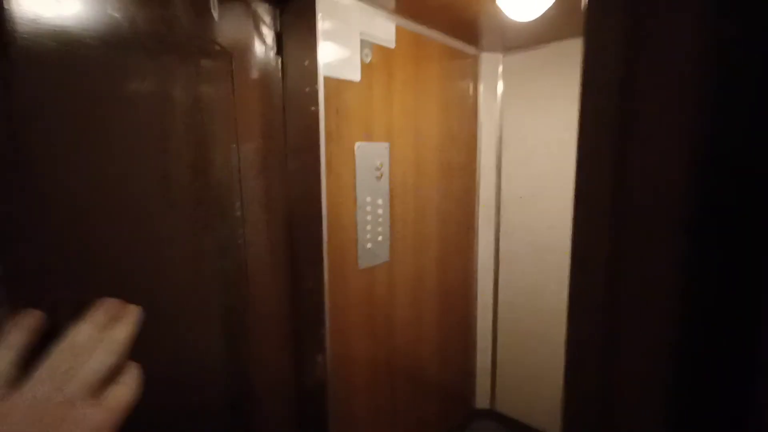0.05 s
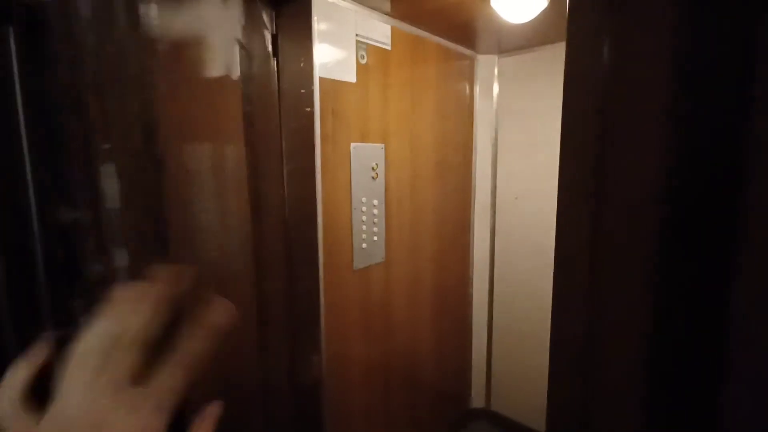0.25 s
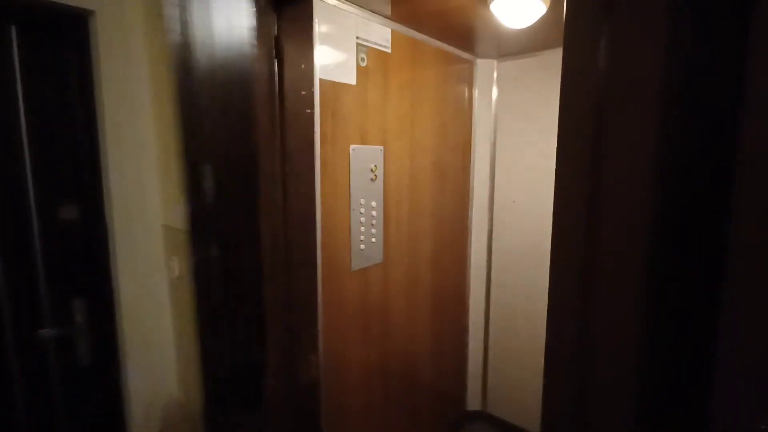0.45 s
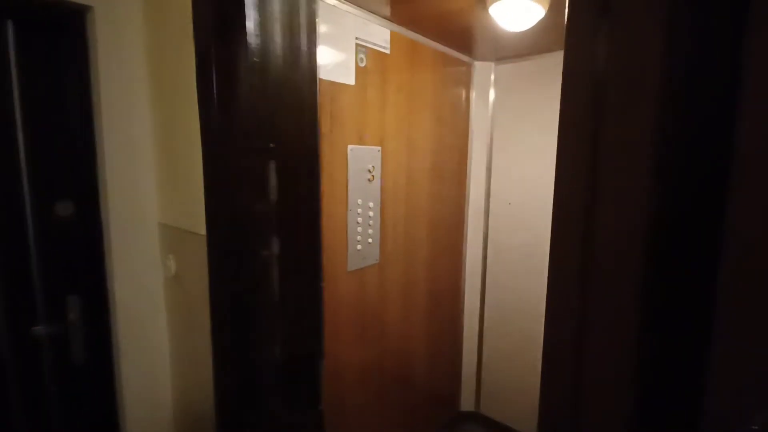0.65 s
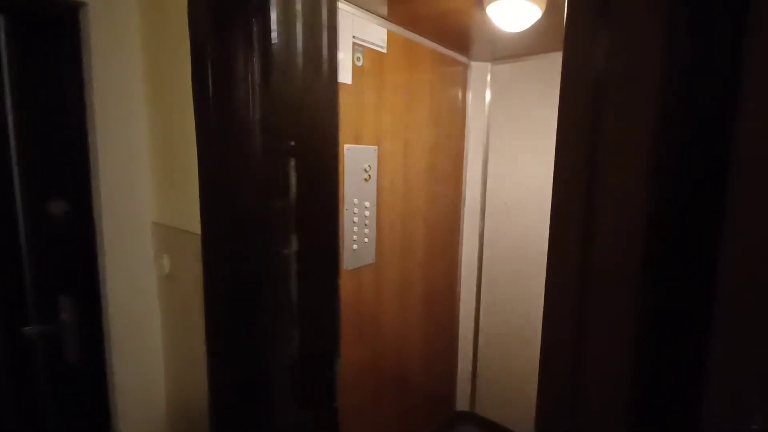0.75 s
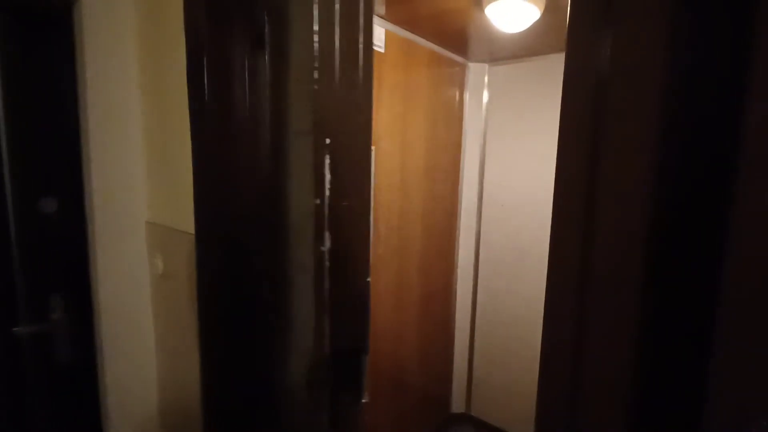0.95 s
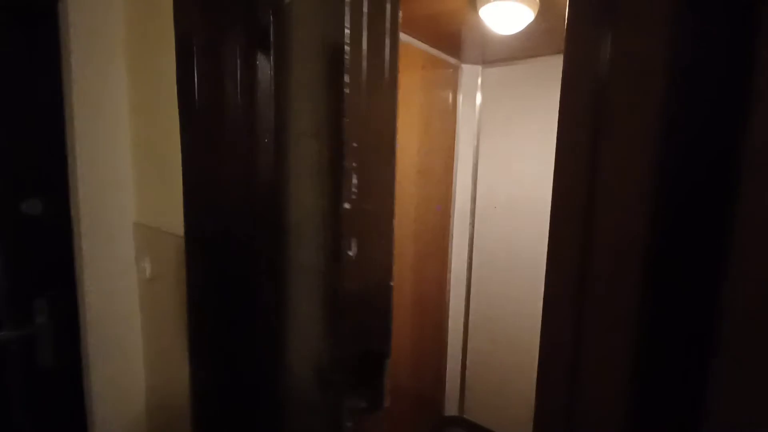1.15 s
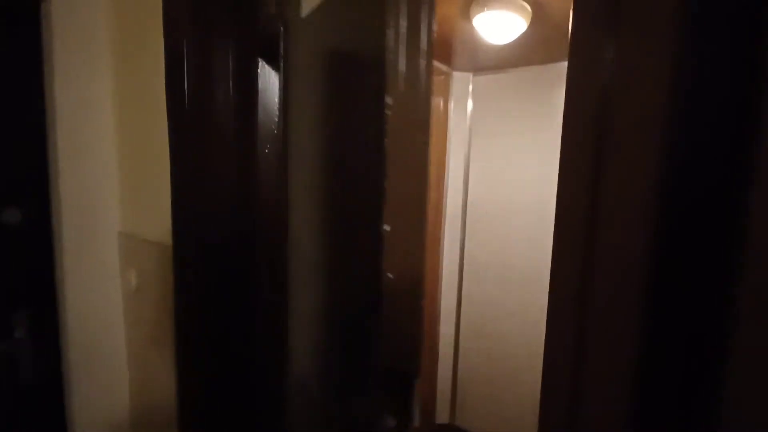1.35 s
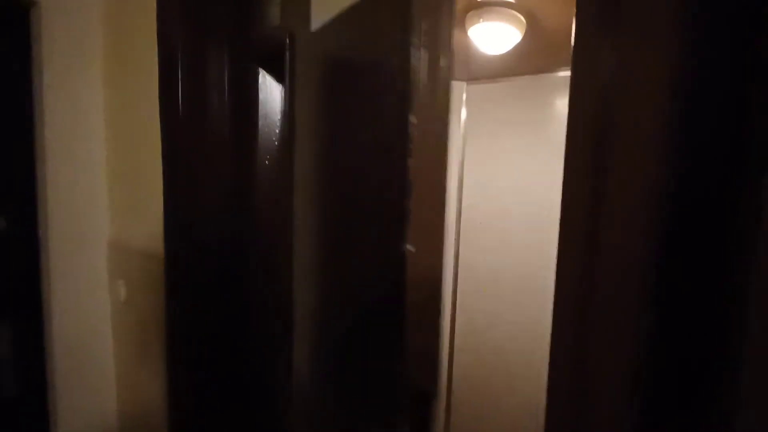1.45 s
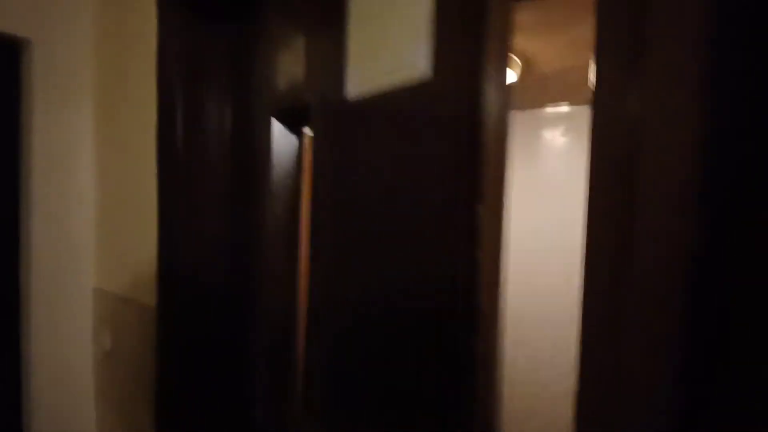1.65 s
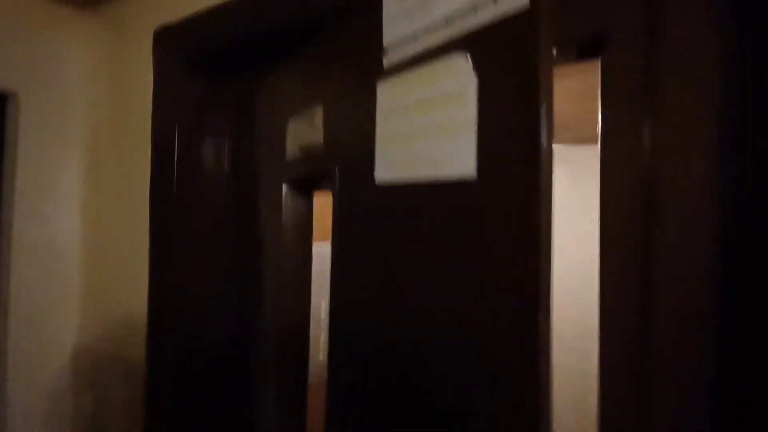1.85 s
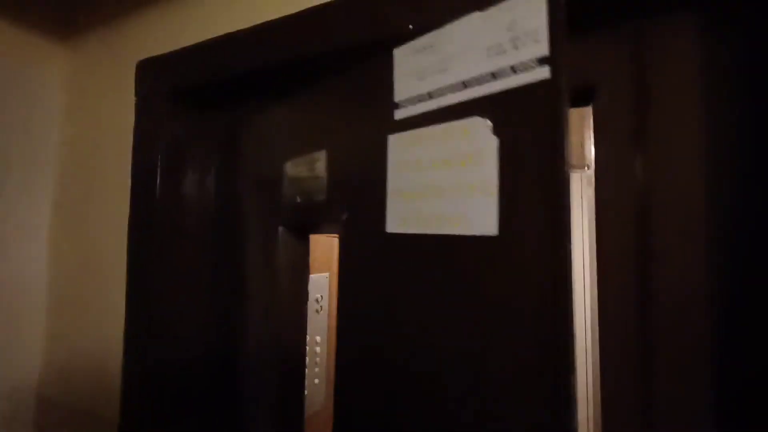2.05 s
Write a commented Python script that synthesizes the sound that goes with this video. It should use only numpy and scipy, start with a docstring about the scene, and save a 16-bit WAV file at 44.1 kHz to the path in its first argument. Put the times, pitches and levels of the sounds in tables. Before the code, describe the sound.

Close up in a bare stairwell, a lift door rumbles and rubs grittily, rolls quietly, then hits its stop with low booming thuds, rattling metal and a last sliding scrape, over soft hiss; treble leans right.

```python
"""A folding lift door on a bare landing, heard from an arm's length by a small pair of microphones.
The pushed leaf drums and slides, rolls nearly quiet, then clunks against its stop and shudders:
blows and small jolts ring its modes, and shaped, gritty noise makes the sliding.
Bands of noise with wavering tones make hinge and panel rubs, the stop's low thud and boom and a
broad scrape; fittings rattle, the latch clanks and the door slides on.
A low hum and hiss fill the stairwell; the left microphone hears less treble."""
import sys
import numpy as np
from scipy import signal
from scipy.fft import rfft, irfft, next_fast_len
from scipy.io import wavfile
from scipy.ndimage import uniform_filter1d

SR = 44100
rng = np.random.default_rng(int(sys.argv[2]) if len(sys.argv) > 2 else 0)


def ratio_of_db(decibels):
    """Turn decibels (scalar or array-like) into linear amplitude factors; 0 dB maps to 1."""
    return 10 ** (np.asarray(decibels, float) / 20)


def transcribe(u):
    """Save the signal u as a 16-bit wav file named by the first command-line argument.

    u: samples, shape (n,) or (channels, n), limited to [-1, 1]; the rate is SR.
    q: integer samples, one column per channel.
    """
    v = np.clip(np.atleast_2d(u).T, -1, 1)
    q = np.round(v * 32767).astype(np.int16)
    wavfile.write(sys.argv[1], SR, q)


N = 92830
T = np.arange(N) / SR  # time of each sample [s]

# ringing modes of door leaf and landing: (frequency [Hz], level [dB], time to fall 60 dB [s])
LEAF_MODES = [(102.4, -9.5, 0.26), (147.8, -6, 0.26), (178.2, -7, 0.16), (207.2, -5, 0.29),
              (232, 0.5, 0.22), (268.2, -4, 0.14), (328.8, -3, 0.12), (389.6, -6, 0.097),
              (463, -10.5, 0.069), (551, -12, 0.13), (692, -10.5, 0.15), (740.7, -11, 0.13)]
# blows on the leaf: (time [s], force level [dB], contact time [ms])
LEAF_BLOWS = [(1.168, -54, 1.25), (1.185, -43, 1.2), (1.217, -39, 1.68), (1.271, -43.5, 2.5),
              (1.514, -41, 2.06)]
# juddering leaf and booming shaft: (time [s], judder level [dB], boom level [dB])
JUDDER_AND_BOOM = [(0, -47, -64), (.1, -53.5, -51.5), (.25, -57.5, -66.5), (.53, -66, -69),
                   (.64, -64.5, -64), (.8, -89, -68.5), (1.16, -88, -71), (1.21, -35.5, -41.5),
                   (1.31, -39.5, -39), (1.38, -39, -57), (1.5, -37.5, -36), (1.53, -42, -55),
                   (1.57, -46, -52), (1.68, -56, -52), (1.85, -86, -52), (1.92, -80, -74), (2.02, -60, -55),
                   (2.1, -70, -72)]
# runners in the track: (time [s], treble level [dB], middle level [dB], change of the top treble [dB])
SLIDE_LEVELS = [(0, -57.5, -54, 1.5), (.1, -54, -60.5, 5.5), (.25, -50.5, -55.5, 1), (.35, -56, -61.5, 1),
                (.52, -63.5, -74.5, 0.5), (.64, -59, -59.5, 0), (.78, -64.5, -74, 2), (1.12, -69, -100, -2),
                (1.17, -61.5, -66, 7), (1.21, -51, -47.5, -14), (1.36, -58, -51, -1.5), (1.43, -52, -55, 4),
                (1.47, -57, -46, -27), (1.58, -55.5, -52, 0.5), (1.75, -57.5, -54, -0.5),
                (1.91, -58.5, -53, -2), (2.0, -64, -59.5, -3), (2.1, -73, -65.5, -1)]
# colour of the sliding treble: (frequency [Hz], relative level per Hz [dB])
SLIDE_TREBLE_COLOUR = [(760, -13), (1300, -9.5), (1770, -4), (2450, -3), (2920, -8.5), (5390, -3),
                       (7750, -24.5), (12800, -14.5), (15500, -22.5)]
# colour of the sliding middle: (frequency [Hz], relative level per Hz [dB])
SLIDE_MIDDLE_COLOUR = [(350, 12), (800, 7), (1200, 5), (1700, -12), (2500, -69)]
# colour of the steady hiss: (frequency [Hz], relative level per Hz [dB])
HISS_COLOUR = [(40, 10), (130, -7), (400, -9.5), (1000, -20.5), (2200, -8), (5500, -13), (7600, -26.5),
               (12800, -15.5), (15500, -22)]
# hinge and panel rubs, the low thud and boom of the stop, and a broad scrape:
# (start [s], length [s], centre frequency [Hz], width [Hz], level [dB])
RUBS_AND_THUDS = [(0.035, 0.07, 232, 12, -49), (0.175, 0.06, 235, 12, -49), (0.195, 0.095, 2410, 90, -62.5),
                  (0.555, 0.07, 1400, 100, -71), (0.635, 0.08, 1385, 100, -68.5),
                  (1.19, 0.15, 195, 70, -39), (1.255, 0.06, 106, 12, -41), (1.495, 0.05, 212, 20, -41),
                  (1.66, 0.3, 1700, 900, -59), (1.82, 0.26, 1440, 240, -64), (1.9, 0.2, 390, 140, -58.5)]
# fittings rattling after a jolt:
# (start [s], level [dB], rise time [s], time to fall 60 dB [s], tilt [dB per octave])
RATTLE_BURSTS = [(1.179, -45.5, 0.013, 0.5, 2), (1.395, -49, 0.0022, 0.72, 4.5),
                 (1.448, -39.5, 0.01, 0.45, -1), (1.492, -45, 0.003, 0.2, 0),
                 (1.885, -52, 0.0089, 0.5, -7.5)]
# colour of the rattles before their tilt: (frequency [Hz], relative level per Hz [dB])
RATTLE_SPECTRUM = [(350, -32), (750, -4), (1400, -9.5), (3000, -5), (5200, -3), (7750, -22), (12800, -15),
                   (15500, -27)]
# ringing modes of the latch: (frequency [Hz], level [dB], time to fall 60 dB [s])
LATCH_MODES = [(1710, -12, .12), (4900, -3, 0.03), (5390, 3, 0.035), (12800, -8, 0.03)]
# likeness of the two microphones: (frequency [Hz], left-right correlation [-1 to 1])
LEFT_RIGHT_LIKENESS = [(60, 0.86), (130, 0.94), (290, 0.98), (640, 0.63), (1410, -0.11), (15000, 0.6)]
# left microphone against the right: (frequency [Hz], level difference [dB])
LEFT_AGAINST_RIGHT = [(100, -3), (700, 0), (1300, -5), (2400, -12.5), (8000, -7), (15000, -16.5)]

JUDDER_PER_S, JUDDER_SCATTER, JUDDER_MS = 160, 2.54, 1.11  # jolts, their unevenness, contact time
SMEAR_S = 0.023  # a blow's short tail of scattered echoes fades to about a third in this time
GRIT_PER_S, GRIT_SCATTER = 1500, 2.36
GRIT_DB = -7  # against the smooth part of the rubbing
FLICKER_DB = 1.26
TOP_FROM_HZ = 8000
BOOM_HZ, BOOM_WIDTH_HZ = 126, 24
BOOM_TONE_DB = 2.5  # wavering tone against the noise around it
HISS_DB = -65
CLEAN_WIDTH_HZ = 35  # a band this wide is half tone, half noise
CLANK_S, CLANK_DB, CLANK_T60_S = 1.397, -65, 0.11
LEFT_LEAD_S = 0.00012
LOW_CUT_HZ = 93


def unit(x):
    """Scale to rms 1."""
    return x / np.sqrt(np.mean(x ** 2))


def read(table, at, column=1, log=False):
    """Draw straight lines between table rows, on a logarithmic scale if asked."""
    rows = np.array(table, float)
    places = rows[:, 0]
    if log:
        at, places = np.log(at + 1), np.log(places + 1)
    return np.interp(at, places, rows[:, column])


def shape(x, gain_at):
    """Weight each frequency by gain_at(Hz)."""
    size = next_fast_len(N + SR // 2)
    hz = np.arange(size // 2 + 1) * SR / size
    return irfft(rfft(x, size) * gain_at(hz), size)[..., :N]


def coloured(x, table):
    """Filter x by the table's frequency curve, then scale to rms 1."""
    return unit(shape(x, lambda hz: ratio_of_db(read(table, hz, log=True))))


def walk(rate):
    """Slow random wandering with rms 1, taking about `rate` new values a second."""
    hold = int(SR / rate)
    steps = np.repeat(rng.standard_normal(N // hold + 1), hold)
    smooth = uniform_filter1d(uniform_filter1d(steps, hold), hold)
    return unit(smooth[:N])


def noise():
    """Two unrelated noises, one for each view: common and sideways."""
    return rng.standard_normal((2, N))


def narrow(hz, width_hz):
    """Noise in one resonance, rms 1."""
    return unit(shape(noise(), lambda f: 1 / (1 + ((f - hz) / (width_hz / 2)) ** 2)))


def wavering_tone(hz, wander):
    """A sine of rms 1 whose pitch wanders by `wander` [Hz] over time."""
    return np.sqrt(2) * np.sin(2 * np.pi * np.cumsum(hz + wander) / SR)


def grains(per_s, scatter):
    """Random contacts of uneven size and either sign, rms 1."""
    chance = rng.random((3, N))
    happens = chance[0] < per_s / SR
    sign = np.sign(chance[1] - 0.5)
    size = ratio_of_db(-scatter * np.log(chance[2] + 1e-4))
    return unit(happens * sign * size)


def push(ms):
    """A soft contact: a smooth hump of force with unit area."""
    force = np.hanning(int(ms * SR / 1000) + 3)
    return force / force.sum()


def strikes(blows):
    """Force of timed contacts, each shared between two samples to place it exactly."""
    force = np.zeros(N)
    for time_s, db, contact_ms in blows:
        hump = ratio_of_db(db) * push(contact_ms)
        at = time_s * SR
        first = int(at)
        late = at - first
        force[first:first + len(hump)] += (1 - late) * hump
        force[first + 1:first + 1 + len(hump)] += late * hump
    return force


def ring(force, modes):
    """Each mode rings and dies under the force, in two views (common, sideways)."""
    out = np.zeros((2, N))
    for k, (hz, db, t60) in enumerate(modes):
        pole = np.exp(2j * np.pi * hz / SR - np.log(1000) / (t60 * SR))
        ringing = ratio_of_db(db) * signal.lfilter([1], [1, -pole], force)
        # neighbouring modes lean to opposite sides
        out += np.array([ringing.imag, (-1) ** k * ringing.real])
    return out


def leaf():
    """Blows, each drawn out into a short scattered burst, and a stream of jolts ring the door leaf."""
    jolts = np.convolve(grains(JUDDER_PER_S, JUDDER_SCATTER), push(JUDDER_MS))[:N]
    # scale the jolts so that their ringing has rms 1 in the common view
    jolts = jolts / np.sqrt(np.mean(ring(jolts, LEAF_MODES)[0] ** 2))
    judder = jolts * ratio_of_db(read(JUDDER_AND_BOOM, T))
    t = np.arange(SR // 10) / SR
    echoes = (rng.random(len(t)) < 300 / SR) * rng.standard_normal(len(t))  # about 300 a second
    spread = (t == 0) + echoes * np.exp(-t / SMEAR_S) * 0.5
    blows = np.convolve(strikes(LEAF_BLOWS), spread)[:N]
    return ring(blows + judder, LEAF_MODES)


def rubbing():
    """Smooth noise with gritty contacts mixed in."""
    grit = np.array([grains(GRIT_PER_S, GRIT_SCATTER) for _ in range(2)])
    return noise() + ratio_of_db(GRIT_DB) * grit


def slide():
    """Gritty rubbing in the track, as a treble and a middle part; the level of each flickers."""
    treble_db = read(SLIDE_LEVELS, T) + FLICKER_DB * walk(24.91)
    treble = coloured(rubbing(), SLIDE_TREBLE_COLOUR) * ratio_of_db(treble_db)
    top = shape(treble, lambda hz: hz > TOP_FROM_HZ)
    treble = treble + top * (ratio_of_db(read(SLIDE_LEVELS, T, column=3)) - 1)
    middle_db = read(SLIDE_LEVELS, T, column=2) + FLICKER_DB * walk(30.12)
    middle = coloured(rubbing(), SLIDE_MIDDLE_COLOUR) * ratio_of_db(middle_db)
    return treble + middle


def stairwell():
    """The shaft's low resonance booms with the door and lingers as a hum over steady hiss."""
    tone = wavering_tone(BOOM_HZ, 4.2 * walk(10.124)) * ratio_of_db(BOOM_TONE_DB)
    boom = unit(tone + narrow(BOOM_HZ, BOOM_WIDTH_HZ))
    boom = boom * ratio_of_db(read(JUDDER_AND_BOOM, T, column=2))
    hiss = coloured(noise(), HISS_COLOUR) * ratio_of_db(HISS_DB)
    return boom + hiss


def rubs_and_thuds():
    """Bands of sound that swell and fade: narrow ones hold more wavering tone, wide ones more noise."""
    out = 0
    for start, length, hz, width, db in RUBS_AND_THUDS:
        tone = wavering_tone(hz, width / 2 * walk(40)) * (CLEAN_WIDTH_HZ / width) ** 2
        band = unit(tone + narrow(hz, width))
        done = np.clip((T - start) / length, 0, 1)
        swell = np.sin(np.pi * done) ** 0.55
        out = out + band * ratio_of_db(db + 2.5 * walk(35.6)) * swell
    return out


def rattles():
    """Bursts of loose metal that rise fast and die into the stairwell."""
    out = 0
    for start, db, rise, t60, tilt_db in RATTLE_BURSTS:
        age = np.maximum(T - start, 0)
        colour = [(hz, d + tilt_db * np.log2(hz / 4000)) for hz, d in RATTLE_SPECTRUM]
        onset = 1 - np.exp(-age / rise)
        level = ratio_of_db(db - 60 * age / t60 + 0.7 * walk(59.54))
        out = out + coloured(noise(), colour) * onset * level
    return out


def latch():
    """The latch chatters briefly, a fading burst of noisy force, and rings."""
    age = T - CLANK_S
    fade = ratio_of_db(CLANK_DB - 60 * np.maximum(age, 0) / CLANK_T60_S)
    return ring(rng.standard_normal(N) * (age > 0) * fade, LATCH_MODES)


def scene():
    """All sources; common and sideways views mixed into left and right."""
    common, sideways = leaf() + slide() + stairwell() + rubs_and_thuds() + rattles() + latch()

    def likeness(hz):
        return np.clip(read(LEFT_RIGHT_LIKENESS, hz, log=True), -0.9, 0.99)

    # the more alike the sides are, the more of the common view they get
    mid = shape(common, lambda hz: np.sqrt((1 + likeness(hz)) / 2))
    side = shape(sideways, lambda hz: np.sqrt((1 - likeness(hz)) / 2))
    return np.array([mid + side, mid - side])


def microphone(x, share):
    """One microphone takes its share (+0.5 left, -0.5 right) of the level and time differences."""
    def gain(hz):
        level = ratio_of_db(share * read(LEFT_AGAINST_RIGHT, hz, log=True))
        return level * np.exp(2j * np.pi * hz * share * LEFT_LEAD_S)
    return shape(x, gain)


def band_limit(x):
    """A steep low-pass at the top of the band."""
    return signal.sosfilt(signal.butter(12, 15690, fs=SR, output="sos"), x)


def record(dry):
    """The left port is shaded in the treble and hears slightly earlier; the bass is cut."""
    stereo = np.array([microphone(dry[0], 0.5), microphone(dry[1], -0.5)])
    low_cut = signal.butter(4, LOW_CUT_HZ, "high", fs=SR, output="sos")
    mix = signal.sosfilt(low_cut, stereo)
    return band_limit(mix)


dry = scene()
out = record(dry)
transcribe(out)
```